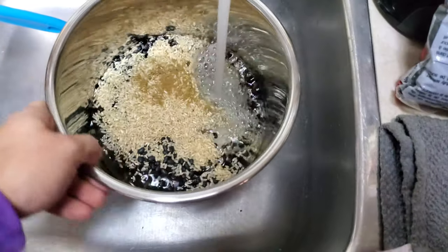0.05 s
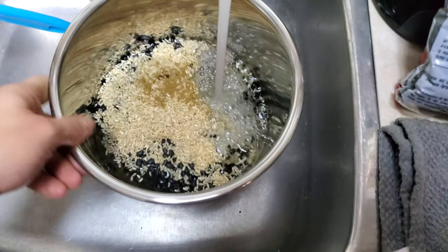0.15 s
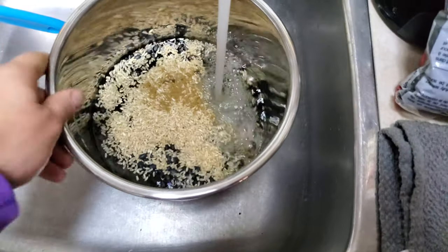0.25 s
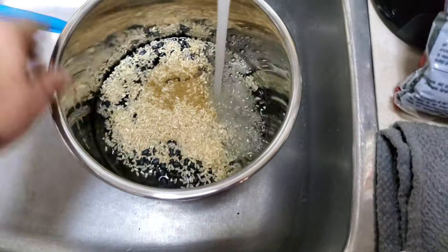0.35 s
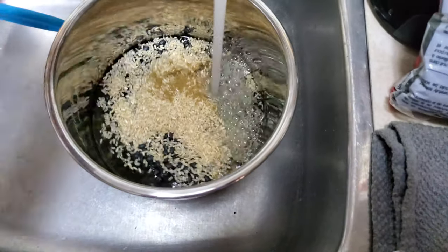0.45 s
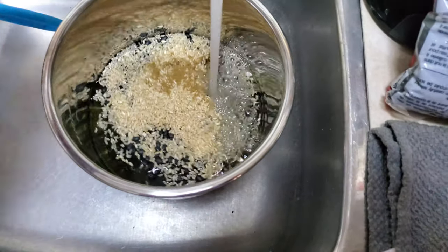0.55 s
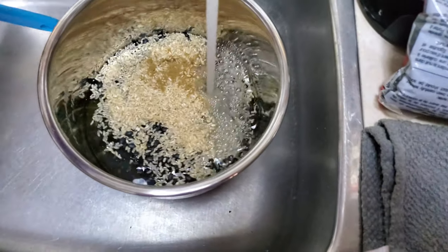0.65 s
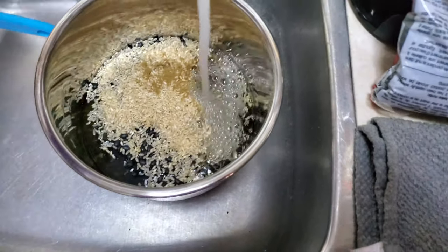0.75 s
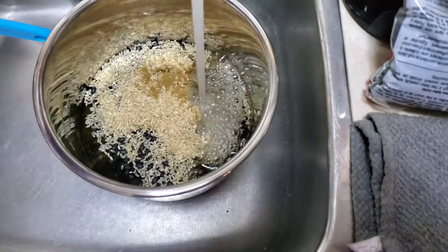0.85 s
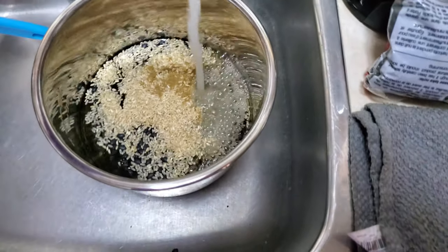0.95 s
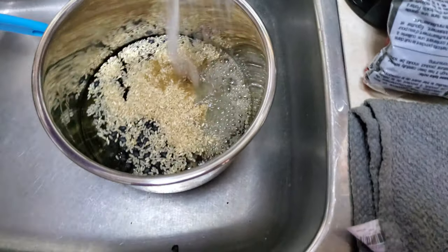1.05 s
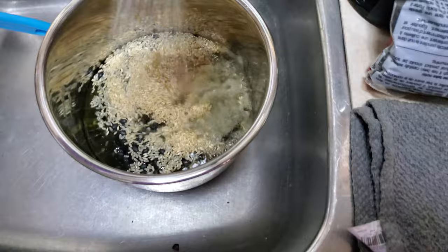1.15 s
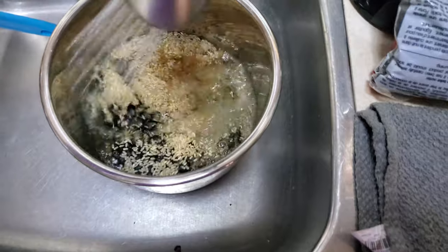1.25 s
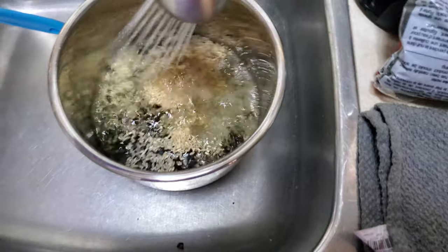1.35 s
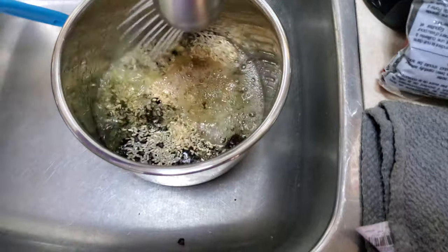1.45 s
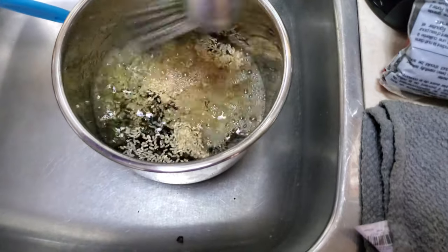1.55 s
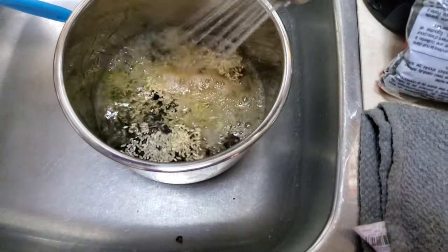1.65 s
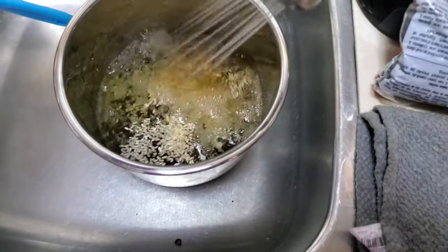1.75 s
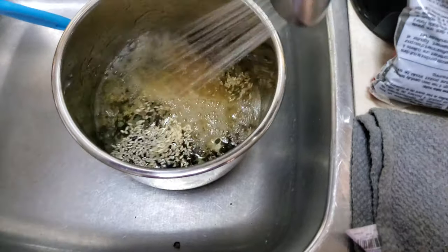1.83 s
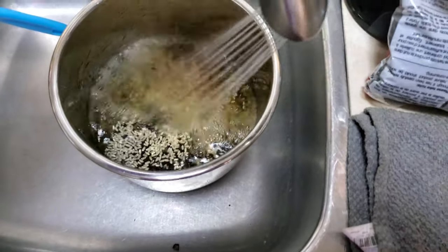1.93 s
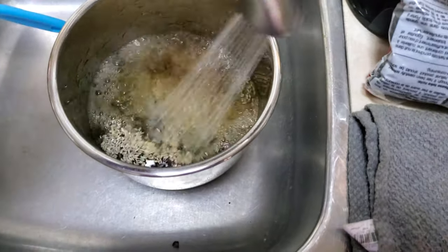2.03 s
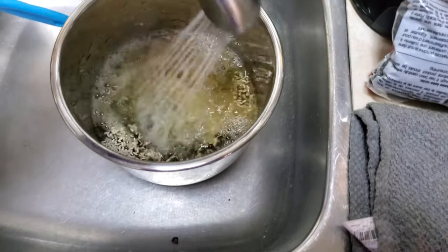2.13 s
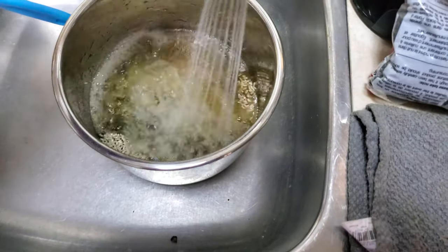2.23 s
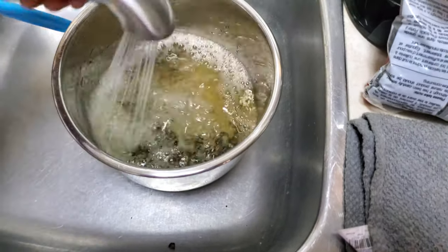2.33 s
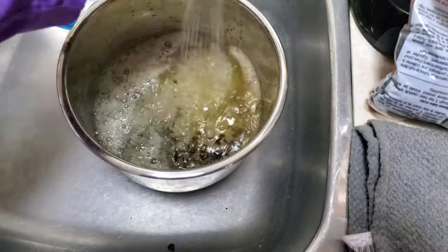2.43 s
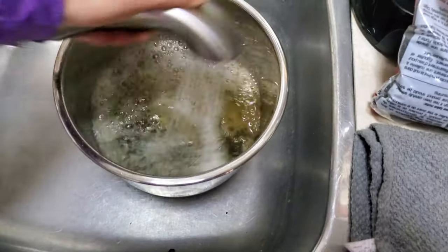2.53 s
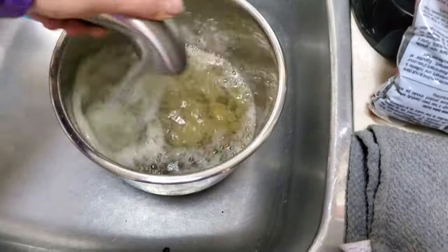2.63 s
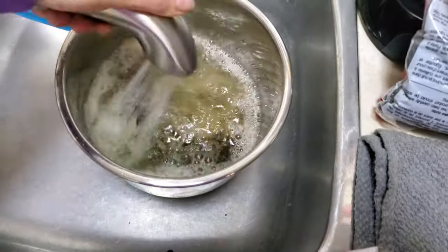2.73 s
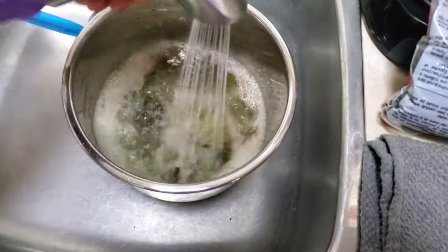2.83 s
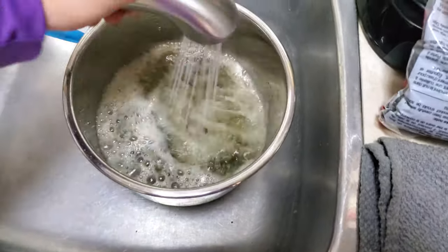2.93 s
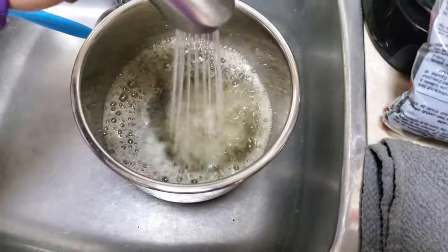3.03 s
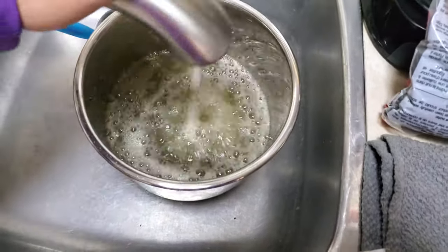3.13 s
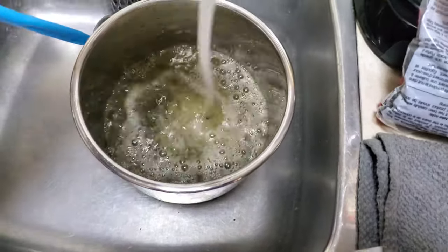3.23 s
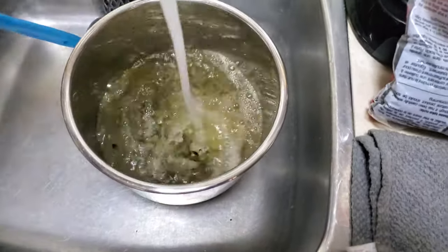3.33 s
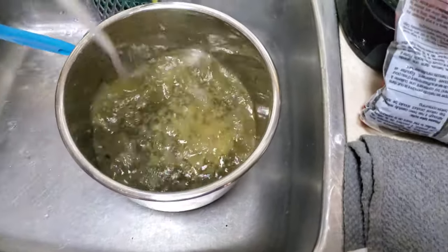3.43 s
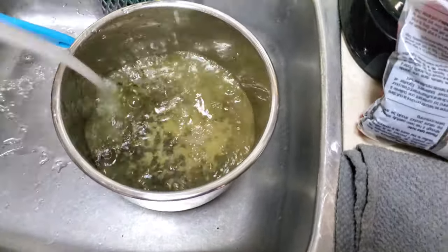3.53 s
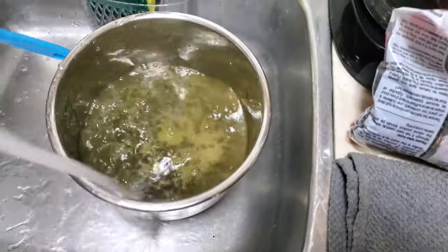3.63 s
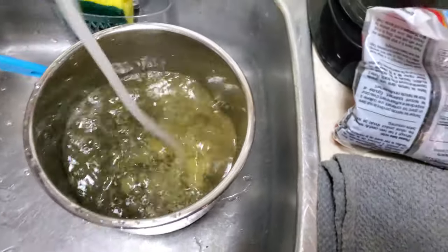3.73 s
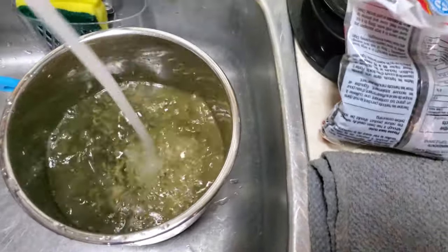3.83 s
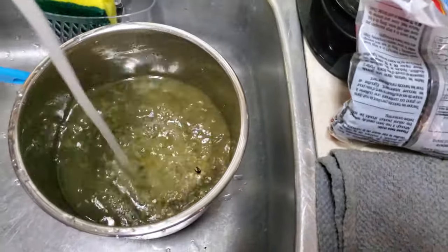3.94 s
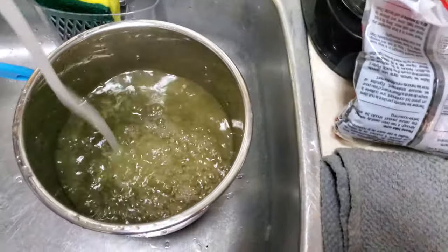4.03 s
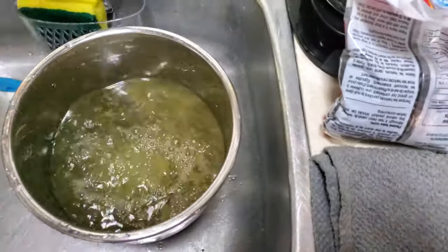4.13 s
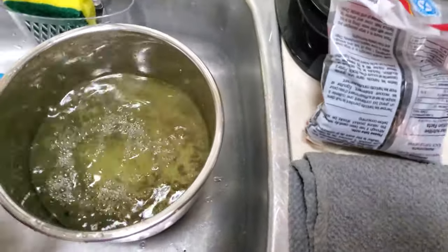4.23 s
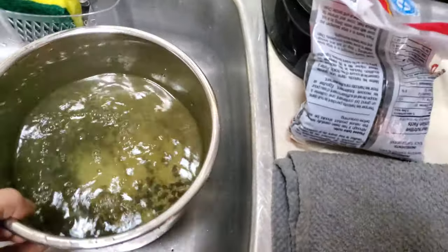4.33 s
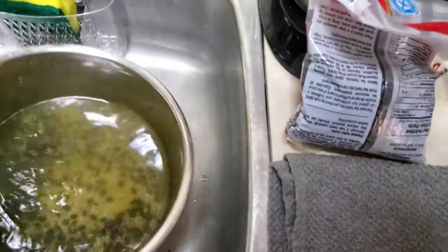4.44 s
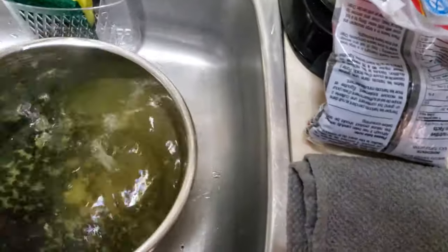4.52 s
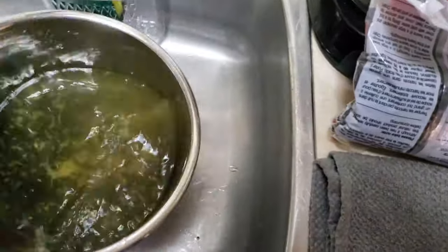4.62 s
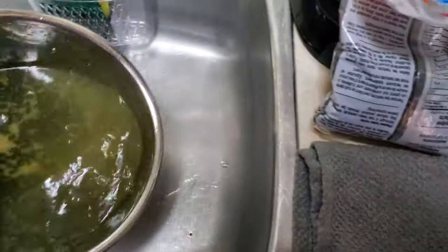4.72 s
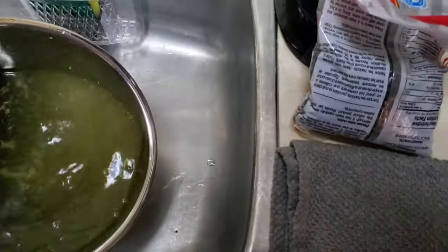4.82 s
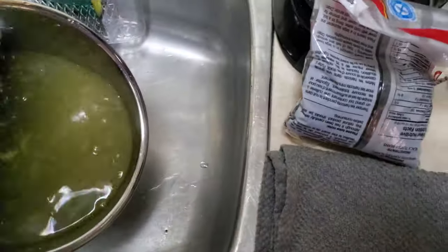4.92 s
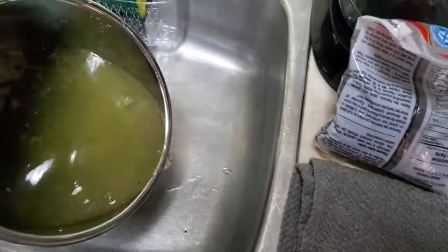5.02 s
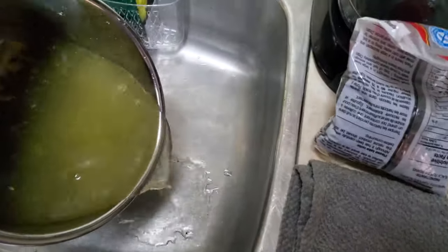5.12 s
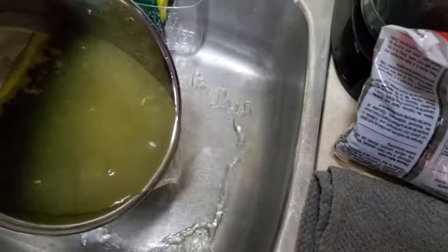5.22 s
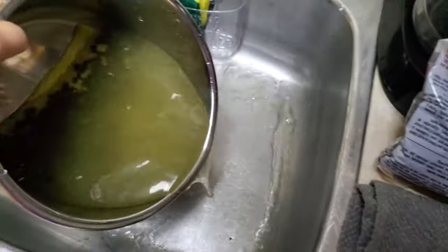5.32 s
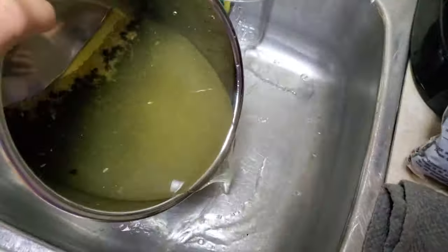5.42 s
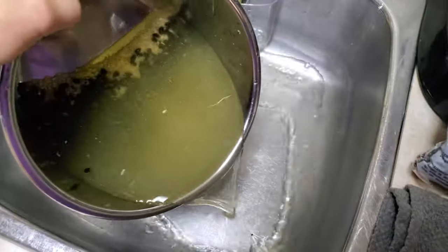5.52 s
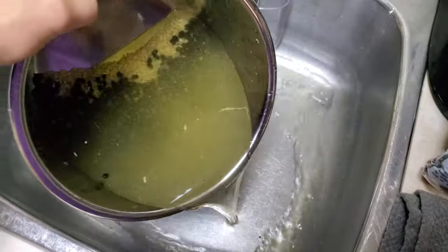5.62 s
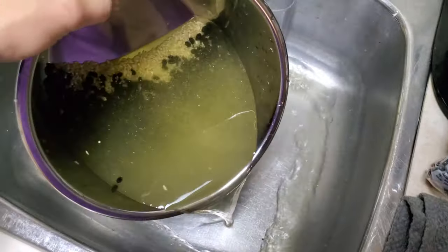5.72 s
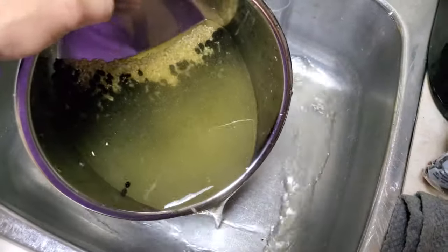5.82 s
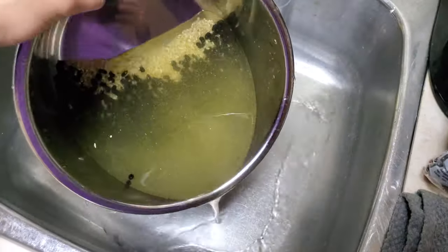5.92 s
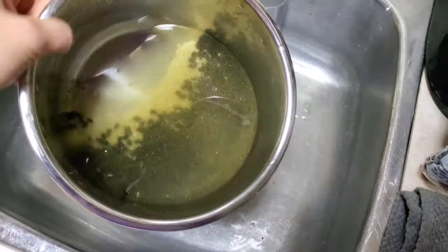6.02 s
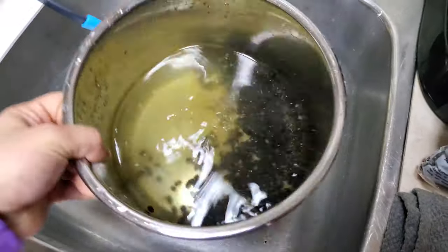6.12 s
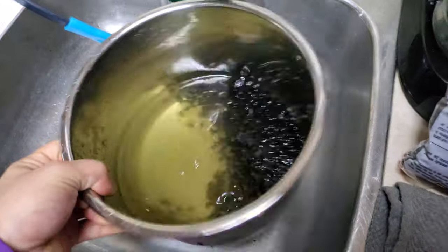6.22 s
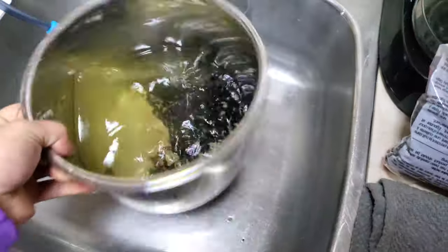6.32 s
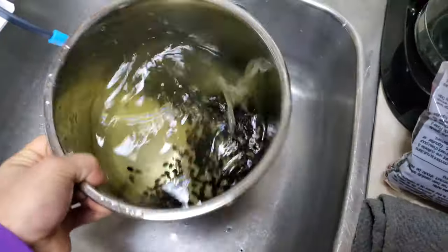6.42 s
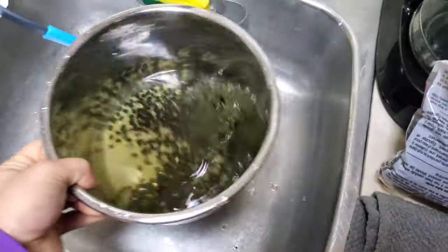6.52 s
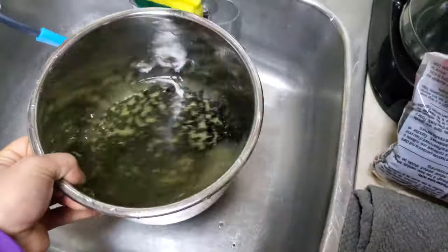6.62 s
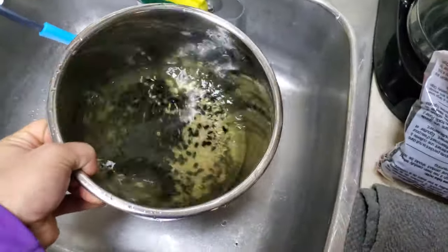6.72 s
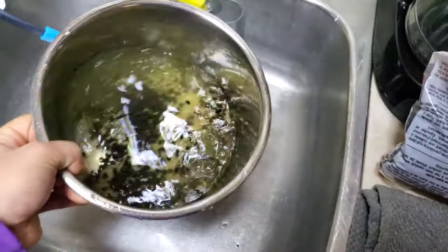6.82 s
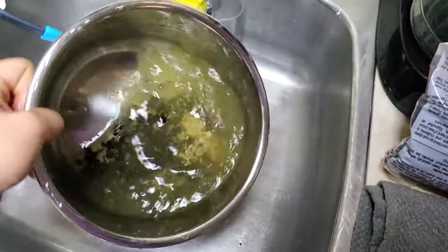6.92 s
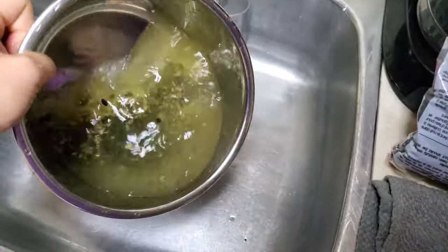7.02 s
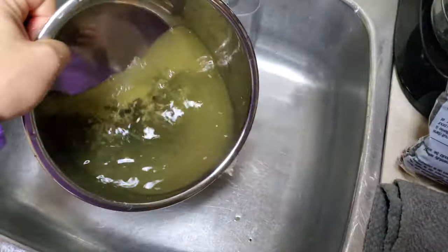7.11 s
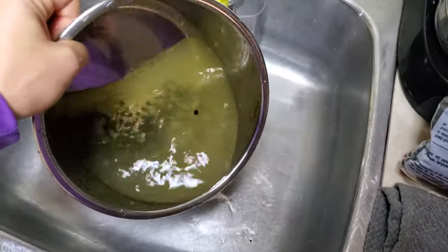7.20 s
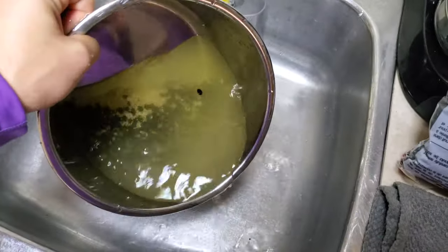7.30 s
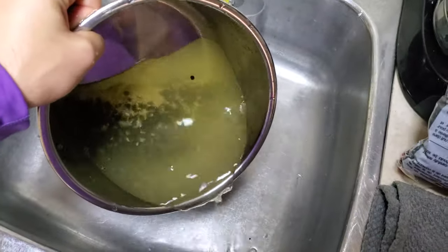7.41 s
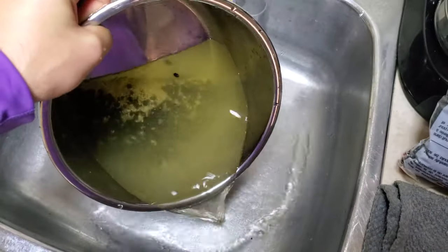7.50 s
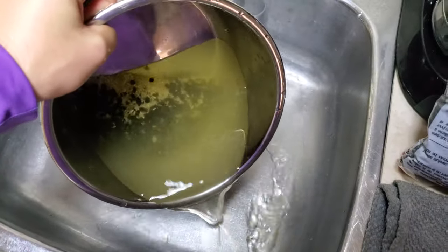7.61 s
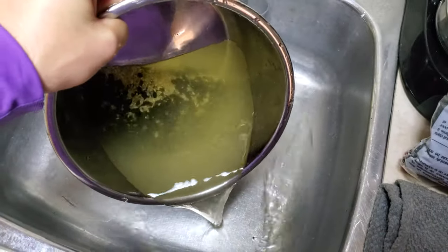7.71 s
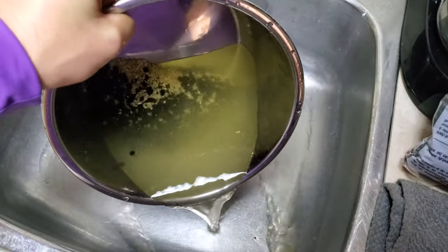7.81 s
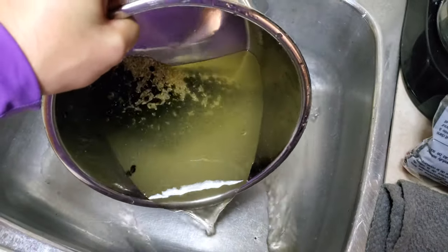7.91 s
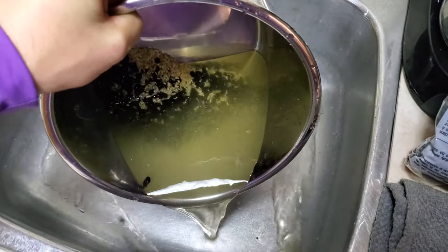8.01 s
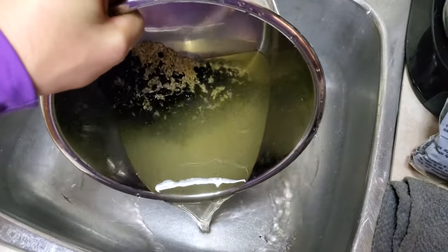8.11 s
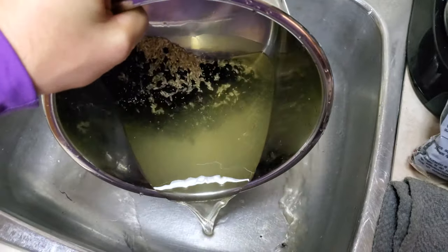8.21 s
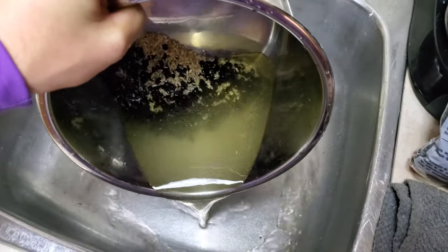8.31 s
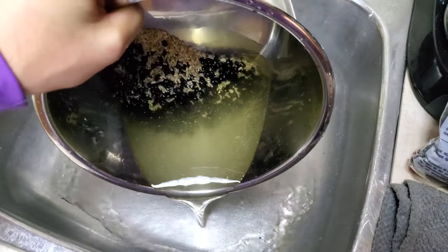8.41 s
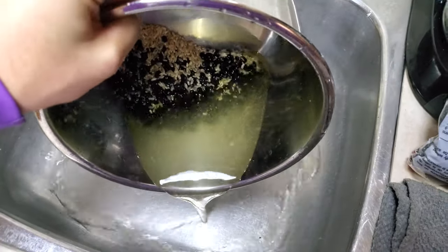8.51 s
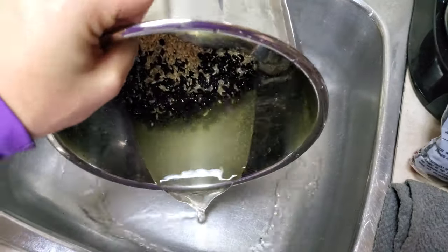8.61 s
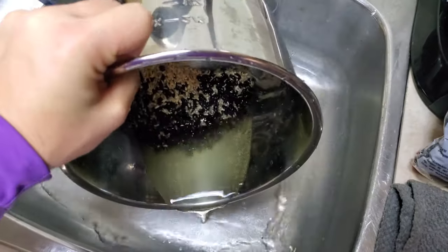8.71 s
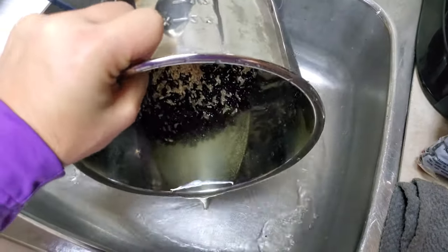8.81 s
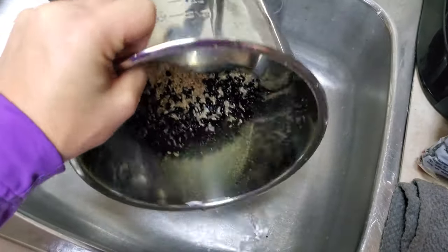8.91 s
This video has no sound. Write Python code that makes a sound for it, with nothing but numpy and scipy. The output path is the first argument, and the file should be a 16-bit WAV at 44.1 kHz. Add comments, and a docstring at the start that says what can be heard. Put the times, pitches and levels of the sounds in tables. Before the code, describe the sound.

Hissing, drumming water fills a metal pot with knocks and a click, then stops; foam fizzes, water sloshes and trickles into the sink.

```python
"""In a kitchen, a tap runs into a steel pot of grain in a steel sink: aerated jet, spray, jet again, then off.
The jet is hissing air, pattering drops, drumming steel and bubbles; foam fizzes after it as noisy drop hits.
The pot is poured off, swirled so that its base rubs on the sink, and poured again: showers of droplets and bubbles.
Plops are single sine bubbles, thumps and knocks damped tones, splashes and clacks short noise bursts.
A low drone of filtered noise and a wavering hum lies beneath."""
import sys
import numpy as np
from scipy import signal
from scipy.fft import rfft, irfft, next_fast_len
from scipy.io import wavfile
from scipy.ndimage import uniform_filter1d

SR = 44100
rng = np.random.default_rng(int(sys.argv[2]) if len(sys.argv) > 2 else 0)


def store_pcm(level_fs):
    """Save levels as 16-bit WAV."""
    pcm = np.round(np.clip(level_fs, -1, 1) * 32767).astype(np.int16)
    wavfile.write(sys.argv[1], SR, np.atleast_2d(pcm).T)


N = 394870
TIME = np.arange(N) / SR

# the tap runs as jet, spray, jet:
# opens_s, closes_s, opening_time_s, air_hiss_db, pot_drumming_db, churning_db
TAP_RUNS = [(0.0, 1.034, 0.00045, -24, -40.5, -38.5), (1.06, 3.16, 0.0038, -23.5, -32.5, -42.5),
            (3.184, 4.142, 0.021, -23, -43, -44.5)]
# tone of crackling droplets: pitch_hz, relative_level_db
FIZZ_TONE = [(1200, -28), (2500, -4.5), (4000, -1.5), (7000, 0), (9000, -13), (10500, -26), (15800, -37)]
# tone of the finest spray: pitch_hz, relative_level_db
MIST_TONE = [(4000, -55), (8000, -8.5), (10300, -3), (12000, 3), (15800, -2.5)]


def from_db(db):
    """Decibels to gain."""
    return 10 ** (np.asarray(db) / 20)


def rms_one(x):
    """Scale to unit power."""
    return x / np.sqrt(np.mean(x ** 2) + 1e-20)


def add(out, start_s, sound):
    """Mix a short sound into out."""
    start = int(np.clip(start_s * SR, 0, N - 1))
    out[..., start:start + sound.shape[-1]] += sound[..., :N - start]


def held(start, stop, attack_s, release_s):
    """Envelope that rises from start, holds, and decays after stop with the time constant release_s."""
    attack = np.clip((TIME - start) / attack_s, 0, 1)
    return attack * np.exp(-np.maximum(0, TIME - stop) / release_s)


def gains(rows, fade_s=0.0054):
    """One gain curve per dB column, dying quickly outside the rows' span."""
    s, *columns = np.transpose(rows)
    outside_s = np.maximum(0, np.maximum(s[0] - TIME, TIME - s[-1]))
    gate = np.exp(-outside_s / fade_s)
    return [gate * from_db(np.interp(TIME, s, c)) for c in columns]


def swells(rows):
    """Bell-shaped swells from rows (centre_s, length_s, level_db, ..): one gain curve per dB column."""
    power = 0
    for s, length, *db in rows:
        bell = np.exp(-np.minimum(4 * (TIME - s) / length, 8) ** 2)
        power = power + np.outer(from_db(db) ** 2, bell)
    return np.sqrt(power)


def drift(rate):
    """Slow random wander with spread 1, through 2 * rate points a second."""
    knots = rng.standard_normal(8192)
    return rms_one(np.interp(TIME * rate * 2, np.arange(len(knots)), knots))


def colour(x, spectrum):
    """Smooth equaliser through (Hz, dB) points."""
    size = next_fast_len(N + 4096)
    hz, db = np.transpose(spectrum)
    bins = np.arange(size // 2 + 1) * SR / size
    gain = from_db(np.interp(np.log(bins + 1), np.log(hz), db))
    return irfft(rfft(x, size) * gain, size)[..., :N]


def band(x, low_hz, high_hz):
    """Second-order band-pass."""
    edges = [low_hz, min(high_hz, SR / 2 - 1)]
    return signal.sosfilt(signal.butter(2, edges, "band", fs=SR, output="sos"), x + 1e-18)


def resonate(x, modes):
    """Parallel resonances (Hz, width Hz, dB) of alternating sign; unit power."""
    out = 0
    for k, (hz, width, db) in enumerate(modes):
        r = np.exp(-np.pi * width / SR)
        poles = [1, -2 * r * np.cos(2 * np.pi * hz / SR), r * r]
        ringing = signal.lfilter([1 - r * r, 0, r * r - 1], poles, x + 1e-18)
        out = out + (-1) ** k * from_db(db) * ringing
    return rms_one(out)


def waver(x, depth_s, rate):
    """Water sloshing against the walls bends the pot's pitch up and down: a wandering time shift."""
    then = TIME + depth_s * drift(rate)
    return np.array([np.interp(then, TIME, ear) for ear in x])


def impacts(per_s, spread_db, clump_db, clump_rate, direct=0.052):
    """Clumped drop hits, many small and few large: a central direct share, the rest reflected to each ear."""
    basin_t60_s = .03
    sizes = from_db(spread_db * np.minimum(rng.exponential(1, N), 4.5)) * rng.choice([-1, 1], N)
    landed = rng.random(N) < per_s / SR
    hits = rms_one(sizes * landed * from_db(clump_db * drift(clump_rate)))
    decay = from_db(-120 / (basin_t60_s * SR))   # acts on power, hence twice 60 dB
    lingering = signal.lfilter([1], [1, -decay], hits ** 2 + 1e-18)
    reflections = rms_one(np.sqrt(lingering) * rng.standard_normal((2, N)))
    return np.sqrt(direct) * hits + np.sqrt(1 - direct) * reflections


def bubble(hz, cycles, rise, place):
    """A sine that swells, dies 60 dB over its cycles and climbs near the surface; place (-1..1) shifts the ears."""
    age = np.arange(int(cycles * SR / hz)) * hz / SR   # in cycles
    between_ears = place * min(hz / 550, np.pi / 2) * np.array([[1], [-1]])
    swell = age / (.16 * cycles)
    tone = np.sin(2 * np.pi * age * (1 + rise * age / cycles / 2) + between_ears)
    return tone * (swell * np.exp(1 - swell)) ** 2


def bubbles(low_hz, high_hz, cycles, rise, spread_db, count, rough=0.38, flutter_at_1khz_hz=170):
    """Bubbles of random time, size and place, roughened by reflections off moving water; steady unit power."""
    out = np.zeros((2, N))
    for when, size, loud, life, place in rng.random((count, 5)):
        strength = from_db(-spread_db * np.log(loud + 0.012))
        hz = low_hz * (high_hz / low_hz) ** size
        add(out, when * N / SR, strength * bubble(hz, cycles * (.5 + life), rise, 2 * place - 1))
    top_hz = flutter_at_1khz_hz * np.sqrt(low_hz / 1000)
    flutter = rms_one(band(rng.standard_normal((2, N)), 20, top_hz))
    out = out * (1 + rough * flutter)
    power = np.mean(out ** 2, axis=0)
    return rms_one(out / np.sqrt(uniform_filter1d(power, SR // 3) + 0.029 * power.mean()))


def rings(rows, t60_at_1khz, size_law, rise, level_db, rough):
    """Single damped tones, longer when lower if size_law is above 0, with a rough halo of reflections."""
    out = np.zeros((2, N))
    for (s, hz, db), place in zip(rows, rng.uniform(-1, 1, len(rows))):
        t60 = t60_at_1khz * (1000 / hz) ** size_law
        tone = bubble(hz, t60 * hz, rise, place)
        noise = band(rng.standard_normal((2, SR // 2)), hz * 0.79, hz * 1.23)
        halo = rms_one(noise)[:, -tone.shape[1]:] * abs(signal.hilbert(tone))
        add(out, s - t60 / 20, from_db(db + level_db) * (tone + rough * halo))
    return out


def hollow(x, depth, sway=0.016, sway_hz=1.7):
    """Close echoes carve notches into the hiss, which shift as the pot and its water move."""
    # off the pot's base and walls: delay_s, strength
    pot_echoes = [(0.00083, 0.37), (0.00141, -0.34), (0.0023, .35), (0.0037, .3)]
    here = np.arange(N)
    out, power = x, 1
    for delay_s, strength in pot_echoes:
        then = here - delay_s * SR * (1 + sway * drift(sway_hz))
        out = out + strength * depth * np.array([np.interp(then, here, ear) for ear in x])
        power = power + (strength * depth) ** 2
    return out / np.sqrt(power)


def tap(hiss_db=1.0, fine_db=-9.5, glug_db=-4.0):
    """Air hisses in the jet; drops patter on the water, drum on the pot and drive bubbles under."""
    # air in the jet: pitch_hz, relative_level_db
    hiss_tone = [(1500, -62), (3500, -9.5), (4700, -4), (6500, -1.5), (8000, -4.5), (10300, -6.5),
                 (11800, -1), (15800, -3.5)]
    # drops on the water: pitch_hz, relative_level_db
    spatter_tone = [(600, -4), (1050, 0), (1330, -5), (2000, 2), (3300, 2.5), (5000, -0.5), (8000, -14),
                    (15000, -18)]
    # spatter as the water moves about the pot: time_s, level_db
    spattering = [(0, -27), (.2, -25), (.43, -36), (1.0, -34), (1.1, -29), (1.17, -26), (1.33, -29.5),
                  (1.42, -24), (1.7, -26), (2.07, -24), (2.62, -25), (3.12, -25), (3.22, -35),
                  (3.35, -27.5), (3.49, -30), (3.57, -27), (3.68, -29.5), (3.78, -29), (4.15, -33)]
    # the water finds a new spot and digs in: centre_s, length_s, drumming_db, churning_db
    plunges = [(0.17, 0.76, -31.5, -30.5), (1.19, 0.13, -29, -34.5), (1.378, .05, -45, -27.5),
               (1.9, 0.59, -26.5, -33), (2.06, 0.11, -33, -25), (2.235, 0.13, -27.5, -28),
               (2.41, .14, -29.5, -42), (3.06, 0.36, -24.5, -38), (3.418, 0.039, -25, -30),
               (3.555, 0.031, -31, -25), (3.755, 0.21, -26, -34.5), (3.83, 0.076, -47, -28)]
    # the pot under drops: pitch_hz, width_hz, relative_level_db
    pot_modes = [(496, 60, 1), (574, 85, 0.5), (693, 116, -6.5), (1075, 43, -6.5)]
    # the jet on still bare steel: pitch_hz, width_hz, relative_level_db
    bare_modes = [(1080, 53, 2), (1594, 130, 3.5), (2030, 140, -0.5), (2660, 160, 2.5), (4630, 460, 3),
                  (6950, 290, 3.5), (8470, 280, 1.5), (11800, 620, 4)]
    valve_close_s, pot_dies_s = 0.00097, 0.033   # time constants

    flowing, hiss, drum, churn = np.zeros((4, N))
    for opens, closes, opening_s, air_db, pot_db, deep_db in TAP_RUNS:
        valve = held(opens, closes, opening_s, valve_close_s)
        ringing = held(opens, closes, opening_s, pot_dies_s)
        flowing += valve
        hiss += valve * from_db(air_db)
        drum += ringing * from_db(pot_db)
        churn += ringing * from_db(deep_db)
    drum, churn = np.hypot([drum, churn], swells(plunges))
    # some flow still passes while the setting is switched
    leak = from_db(-17) * (TIME < TAP_RUNS[-1][1])
    hiss = np.maximum(hiss, leak * hiss.max()) * from_db(0.25 * drift(2.3))
    spatter = np.maximum(flowing, leak) * gains(spattering)[0]
    first_jet = held(*TAP_RUNS[0][:3], pot_dies_s)
    last_jet = held(*TAP_RUNS[-1][:3], pot_dies_s)
    # bare steel rings ever less as the grain covers it: 3 dB per second
    bare = first_jet * from_db(-27 - 3 * TIME)
    # the last jet drives coarse bubbles into the full pot
    full = last_jet * from_db(-49)

    air = hollow(impacts(16000, 0.75, 1.0, 60, direct=0.016), depth=0.081 + 0.32 * first_jet)
    air = rms_one(colour(air, hiss_tone))
    steel = resonate(rng.standard_normal((2, N)), bare_modes)
    drops = rms_one(colour(impacts(5000, 2.9, 1.0, 50, direct=0.086), spatter_tone))
    fine = bubbles(1501, 5690, cycles=91, rise=0.042, spread_db=5.5, count=4000)
    pot = waver(resonate(impacts(1500, 0.95, 1.6, 15, direct=0.41), pot_modes), depth_s=0.00256, rate=5)
    glugs = bubbles(399, 898, cycles=27, rise=0.071, spread_db=3.0, count=550, rough=0.35)
    deep = bubbles(215, 439.3, cycles=27, rise=0.097, spread_db=2.5, count=900)
    coarse = bubbles(806, 3300, cycles=29, rise=0.08, spread_db=7.0, count=900, rough=0.9)
    return (from_db(hiss_db) * hiss * air + bare * steel
            + spatter * (drops + from_db(fine_db) * fine)
            + drum * (pot + from_db(glug_db) * glugs)
            + churn * deep + full * coarse)


def rub(attack_s=0.029, release_s=0.022, shove_attack_s=0.0023, shove_release_s=0.032,
        chatter_hz=21, chatter_db=2.2):
    """Slips set pot and sink ringing; once full, the base sticks and slips in pulses at wavering pitches."""
    # the nearly empty pot is shoved under the tap: start_s, stop_s, level_db
    shoves = [(0.0, 0.11, -23.5), (0.117, 0.165, -21.5)]
    # the full pot's base rubs on the sink: start_s, stop_s, level_db
    rubs = [(6.354, 6.493, -34), (6.807, 7.022, -22)]
    # ring of the shoved pot: pitch_hz, width_hz, relative_level_db
    push_modes = [(491.3, 17, 0)]
    # ring of the full pot on the sink: pitch_hz, width_hz, relative_level_db
    rub_modes = [(249.3, 9.8, 11.5), (535, 32, -0.5), (825, 55, 4), (903, 68, 0.5), (1473, 52, -7)]
    slips = impacts(700, 1.5, 1.5, 20, direct=.6)
    pulses = np.sin(2 * np.pi * chatter_hz * TIME + .6 * drift(5))
    chatter = rms_one(from_db(chatter_db * pulses))
    empty = sum(from_db(db) * held(start, stop, shove_attack_s, shove_release_s) for start, stop, db in shoves)
    full = sum(from_db(db) * held(start, stop, attack_s, release_s) for start, stop, db in rubs)
    full_ring = waver(resonate(slips, rub_modes), depth_s=0.0006, rate=12)
    return empty * resonate(slips, push_modes) + full * chatter * full_ring


def rumble(level_db=-32.5, side_db=-3.5, hum_db=-42):
    """The kitchen's low background drone of noise, with a wavering hum from a narrow resonance."""
    # tone of the drone: pitch_hz, relative_level_db
    drone_tone = [(22, -13.5), (40, -10), (55, 2), (72, -1), (95, 2), (125, -2.5), (160, -7.5),
                  (260, -17.5), (400, -25.5), (800, -37), (1500, -93)]
    mid, side = rms_one(colour(rng.standard_normal((2, N)), drone_tone + [(4000, -68)]))
    hum = from_db(hum_db) * resonate(rng.standard_normal(N), [(94.7, 3, 0)])
    return from_db(level_db) * (mid + from_db(side_db) * side * np.array([[1], [-1]])) + hum


def knocks():
    """Each bump of the pot on the sink floor rings the modes at slightly different strengths and pitches."""
    # the nearly empty pot bumps: start_s, level_db
    bumps = [(0.003, -16.5), (0.211, -17.5), (0.239, -15), (0.326, -14)]
    # what pot and sink ring with: pitch_hz, t60_s, relative_level_db
    knock_modes = [(153, 0.096, -9.5), (298, 0.16, 0), (371, 0.15, -3), (654, 0.2, -11.5),
                   (1090, 0.15, -17), (1273, 0.18, -15.5)]
    age = np.arange(SR // 4) / SR
    out = np.zeros((2, N))
    for s, db in bumps:
        chances = rng.uniform(-1.14, 1, (len(knock_modes), 3))
        for (hz, t60, mode_db), (louder, higher, place) in zip(knock_modes, chances):
            phase = 2 * np.pi * hz * (1 + .02 * higher) * age + place * np.array([[.5], [-.5]])
            add(out, s, from_db(db + mode_db + 2 * louder - 60 * age / t60) * np.sin(phase))
    return out


def thumps():
    """Dull knocks of water and pot on the sink: low tones of steady pitch that die at once."""
    # time_s, pitch_hz, level_db before the common trim
    thump_rows = [(0.243, 95, -15.5), (0.352, 198, -16), (1.107, 99, -13), (1.365, 183, -14),
                  (2.042, 267, -14), (2.255, 190, -16.5), (3.807, 235, -12.5), (4.009, 399, -17.5),
                  (4.006, 70.4, -15), (4.151, 96, -9.5), (6.03, 300, -22), (6.386, 170, -15.5),
                  (6.46, 208, -10.5), (7.064, 266, -15.5)]
    return rings(thump_rows, t60_at_1khz=0.042, size_law=0, rise=0, level_db=-1.5, rough=0.3)


def clacks(decay_s=0.0045, low_hz=350, high_hz=3200):
    """A hard snap of noise that dies within milliseconds, as the spray head is switched and handled."""
    # start_s, level_db
    clack_rows = [(1.0194, -14.5), (3.162, -27), (4.008, -21.5)]
    snaps = sum(from_db(db) * held(s, s, 1 / SR, decay_s) for s, db in clack_rows)
    noise = rng.standard_normal((2, N)) + rng.standard_normal(N)   # partly shared by the ears
    return snaps * rms_one(band(noise, low_hz, high_hz))


def plops():
    """Single large bubbles: tones whose pitch climbs as they ring."""
    # time_s, starting_pitch_hz, level_db before the common trim
    plop_rows = [(1.146, 466, -19), (3.198, 515, -21.5), (3.202, 904, -25.5), (3.396, 573, -20.5),
                 (3.398, 1270, -24.5), (3.422, 384, -18), (3.539, 496, -23), (3.766, 513.2, -17),
                 (3.882, 547, -23), (3.961, 680, -21), (4.191, 548, -23.5), (4.435, 1525, -26),
                 (4.626, 1580, -23.5), (4.631, 2738, -23), (4.665, 3990, -24.5), (4.778, 2140, -36.5),
                 (4.895, 1620, -27), (5.07, 1950, -36), (5.163, 2350, -37), (5.392, 2590, -38),
                 (5.44, 1342, -33), (5.498, 775, -27), (5.605, 764, -24.5), (5.698, 2460, -32),
                 (5.894, 3230, -31), (5.982, 3420, -30), (6.019, 1750, -30), (6.058, 1665, -23),
                 (6.07, 2120, -27), (6.229, 3080, -26), (6.402, 1870, -24), (6.43, 2350, -25),
                 (6.539, 2610, -24), (6.596, 3900, -23), (6.7, 1060, -26), (6.728, 471, -18.5),
                 (6.828, 483, -20), (7.073, 540, -24), (7.083, 1066, -20), (7.721, 543, -20.5),
                 (7.83, 803, -20.5), (7.833, 1440, -41), (7.88, 635, -29), (7.915, 517, -27),
                 (7.955, 840, -32), (8.02, 560, -29.5), (7.963, 1420, -27), (8.076, 2390, -30),
                 (8.076, 3150, -29.5), (8.131, 1415, -30.5), (8.15, 1640, -28), (8.219, 3100, -30),
                 (8.266, 960, -29.5), (8.855, 3700, -33), (8.94, 1620, -27)]
    return rings(plop_rows, t60_at_1khz=0.052, size_law=0.08, rise=0.054, level_db=-2.0, rough=0.5)


def stray_drops():
    """A drop of spray on the microphone is one very short, dry spike."""
    # time_s, peak_db
    drop_rows = [(2.3694, 4.5), (2.4123, 1.5), (2.454, -1)]
    out = np.zeros((2, N))
    for s, db in drop_rows:
        add(out, s, from_db([db]))
    return out


def splashes(swell_s=0.0086, body_db=-5.5, spray_db=-4.0, treble_db=-1.0):
    """Each splash is a short shower of droplets: bright spray over a body below about 3 kHz."""
    # time_s, spray_level_db, body_level_db, both before the common trims
    splash_rows = [(3.568, -20, -22.5), (4.338, -28.5, -37), (4.431, -20.5, -31), (4.571, -21.5, -38),
                   (4.6047, -25, -31), (4.629, -26, -30), (4.676, -23, -55), (4.982, -37, -46),
                   (5.147, -32.5, -45), (5.314, -26, -39), (5.445, -27.5, -37), (5.497, -27.5, -58),
                   (5.615, -27, -29), (5.938, -21.5, -34), (6.312, -23.5, -56), (6.531, -21.5, -54),
                   (6.594, -18.5, -45), (6.6894, -19, -24), (6.772, -15.5, -17), (7.085, -20, -19.5),
                   (7.378, -25.5, -47), (7.654, -27, -48), (7.786, -29, -39), (8.195, -19, -21.5)]
    age = np.arange(SR // 8) / SR / swell_s
    shower = (age * np.exp(1 - age)) ** 2
    body, spray = np.zeros((2, N))
    for s, high_db, low_db in splash_rows:
        add(body, s - swell_s / 2, from_db(low_db + body_db) * shower)
        add(spray, s - swell_s / 2, from_db(high_db + spray_db) * shower)
    hits = impacts(4500, 1.2, .5, 83)
    bright = colour(hits, [(1500, -26), (4000, 6.5), (7000, 5.0), (10000, treble_db)])
    return body * rms_one(band(hits, 340, 3100)) + spray * rms_one(bright)


def foam(mist_db=-7, first_mist_db=-45, first_mist_s=0.16, rises_s=0.51, foam_db=-31.5, fades_db_per_s=22.5):
    """Foam left by the tap wells up and fizzes away as countless tiny bubbles burst."""
    age = TIME - TAP_RUNS[-1][1]
    level = np.clip(age / rises_s, 0, 1) * from_db(foam_db - fades_db_per_s * age)
    pops = impacts(7000, 3.5, 1.5, 25, direct=.08)
    # the smallest bubbles burst first
    finest = from_db(first_mist_db) * (age > 0) * np.exp(-abs(age) / first_mist_s)
    mist = np.hypot(level * from_db(mist_db), finest)
    return level * rms_one(colour(pops, FIZZ_TONE)) + mist * rms_one(colour(pops, MIST_TONE))


def stirring(uneven_db=1.5, uneven_hz=12):
    """Strength of spray, fizz, trickle and gurgle from pours, swirl and sloshes; the poured flow is uneven."""
    # flow over the rim, one list per pour: time_s, level_db
    pours = [
        [(5.2, -52.5), (5.45, -42), (5.55, -47), (5.63, -36.5), (5.8, -39), (5.87, -44), (5.96, -38.5),
         (6.1, -33), (6.22, -40)],
        [(7.56, -50.5), (7.64, -45), (7.9, -44.5), (7.98, -39), (8.2, -40), (8.35, -38.5), (8.55, -46),
         (8.7, -41.5), (8.94, -48.5)],
    ]
    # vigour of the swirl between the pours: time_s, level_db
    swirl = [(6.22, -34.5), (6.42, -27), (6.52, -31.5), (6.63, -29), (6.71, -20.5), (6.8, -23),
             (7.02, -26.5), (7.125, -40), (7.52, -47)]
    # a wave slaps the wall of pot or sink: centre_s, length_s, fizz_db, trickle_db, gurgle_db
    sloshes = [(4.16, 0.14, -32, -34, -30), (4.425, 0.089, -40, -23.5, -27), (4.61, 0.16, -43, -32, -54),
               (4.98, 0.25, -63, -40.5, -54), (5.72, 0.17, -44, -45, -47), (6.44, 0.21, -47, -34, -28.5),
               (7.075, 0.048, -38, -28, -24), (7.63, 0.062, -48, -39, -32), (7.96, 0.16, -55, -35, -27),
               (8.13, 0.25, -38.5, -39, -58)]
    # given off against the motion's own level: finest_spray_db, fizz_db, trickle_db, gurgle_db
    pour_mix = (-3.5, -2.5, 1.5, -3.5)
    # the same for the swirl: finest_spray_db, fizz_db, trickle_db, gurgle_db
    swirl_mix = (-10.5, -2, -11, -7.5)
    flow = sum(gains(rows)[0] for rows in pours) * from_db(uneven_db * drift(uneven_hz))
    fizz, trickle, gurgle = swells(sloshes)
    parts = [np.outer(from_db(pour_mix), flow),
             np.outer(from_db(swirl_mix), gains(swirl)[0]),
             [from_db(-1) * fizz, fizz, trickle, gurgle]]
    return np.linalg.norm(parts, axis=0), flow


def showers(per_s, spread_db, swell_s, wash):
    """Envelope of a stream that breaks into little showers of droplets over a steady wash; unit power."""
    step = 16   # samples per envelope point
    size = N // step + 1
    strengths = from_db(spread_db * np.minimum(rng.exponential(1, size), 2.5))
    starts = (rng.random(size) < per_s * step / SR) * strengths
    r = np.exp(-step / (swell_s * SR))
    bursts = rms_one(signal.lfilter([1], np.poly([r, r, r]), starts + 1e-12))
    return np.repeat(rms_one(np.hypot(wash, bursts)), step)[:N]


def droplets(per_s, spread_db, swell_s, wash, count=18):
    """Droplets of each size sound in their own narrow range and come in their own showers."""
    crackle = [impacts(4500, 1.8, 0.68, 18, direct=0.041) for _ in range(2)]
    edges = np.linspace(np.sqrt(800), np.sqrt(16500), count + 1) ** 2
    out = 0
    for k in range(count):
        out = out + band(crackle[k % 2], edges[k], edges[k + 1]) * showers(per_s, spread_db, swell_s, wash)
    return rms_one(out)


def pour(mist_db=-0.5, ping_db=-10.5, trickle_db=-8.0, patter_db=-4.5,
         slosh_db=-3.5, gurgle_db=-6.5, floor_drum_db=2.5):
    """Moving water breaks on the steel into droplets and ringing bubbles; the pours drum on the sink floor."""
    (mist, fizz, trickle, gurgle), flow = stirring()
    # the stronger the flow, the more the single grains merge into an even wash
    grainy = 1 / np.hypot(1, fizz / from_db(-31))
    merged = np.sqrt(1 - grainy ** 2)
    wash = impacts(9000, 2.2, 1.2, 25, direct=.08)
    grains = droplets(per_s=32, spread_db=3.0, swell_s=0.0027, wash=0.4)
    grains = grains * showers(per_s=28, spread_db=2.5, swell_s=0.0041, wash=0.97)
    spray = grainy * grains + merged * wash

    pings = bubbles(3020, 8370, cycles=150, rise=0.073, spread_db=-0.5, count=1500,
                    rough=0.7, flutter_at_1khz_hz=240)
    drips = bubbles(1300, 4300, cycles=88, rise=0.067, spread_db=6.0, count=1500,
                    rough=1.2, flutter_at_1khz_hz=174)
    patter = rms_one(colour(spray, [(600, 1), (1200, -5), (2000, 0), (3300, -2.0), (6000, -23)]))
    slosh = rms_one(band(impacts(400, 3.8, 2.4, 13, direct=0.14), 175, 321))
    gurgles = bubbles(400, 1400, cycles=32, rise=0.08, spread_db=3.5, count=1100, rough=0.7)
    drips = 0.9 * np.hypot(grainy, 0.4) * drips
    slosh_level = np.hypot(gurgle * from_db(slosh_db), flow * from_db(floor_drum_db))
    return (from_db(mist_db) * mist * rms_one(colour(spray, MIST_TONE))
            + fizz * (rms_one(colour(spray, FIZZ_TONE)) + from_db(ping_db) * pings)
            + trickle * from_db(trickle_db) * (drips + from_db(patter_db) * patter)
            + slosh_level * slosh + from_db(gurgle_db) * gurgle * gurgles)


def ticks(swell_s=0.0046, width_hz=850, level_db=-5.0):
    """Each drop on the steel gives a short, rough ring in a narrow range that the sink's reflections smear."""
    # start_s, pitch_hz, level_db before the common trim
    tick_rows = [(4.567, 6120, -28), (4.678, 6700, -23), (5.218, 4225, -32), (5.449, 6400, -28),
                 (5.907, 6100, -25), (6.314, 6700, -19.5), (7.378, 6040, -26), (8.455, 8100, -32)]
    age = np.arange(SR // 16) / SR / swell_s
    out = np.zeros((2, N))
    for s, hz, db in tick_rows:
        noise = band(rng.standard_normal((2, SR // 8)), hz - width_hz / 2, hz + width_hz / 2)
        ring = rms_one(noise)[:, -len(age):]
        add(out, s, from_db(db + level_db) * age * np.exp(1 - age) * ring)
    return out


def kitchen(x, t60=0.15, tail_db=-14):
    """The room's faint tail of decaying noise, different at each ear."""
    age = np.arange(SR // 3) / SR
    echoes = rms_one(rng.standard_normal((2, len(age))) * from_db(-60 * age / t60)) / np.sqrt(len(age))
    return x + from_db(tail_db) * signal.fftconvolve(x, echoes, axes=1)[:, :N]


def limiter(x, limit_db=-3.5, release_db_per_s=417):
    """The gain drops at once on a peak and recovers at a steady rate."""
    over = np.maximum(0, 20 * np.log10(abs(x).max(axis=0) + 1e-9) - limit_db)
    recovery = release_db_per_s * TIME
    return x * from_db(recovery - np.maximum.accumulate(over + recovery))


def scene():
    """Water and pot sound in the kitchen; stray drops and the drone stay without the room's tail."""
    water = tap() + plops() + splashes() + foam() + pour() + ticks()
    steel = rub() + knocks() + thumps() + clacks()
    return kitchen(water + steel) + stray_drops() + rumble()


def record(dry):
    """Each microphone port has its own colour; a limiter ducks after peaks; the top is cut."""
    # difference between the ports: pitch_hz, left_minus_right_db
    balance = [(100, 0.5), (560, 4.5), (900, 2), (1350, 5.5), (2200, 3), (3200, 0), (5000, -2), (7600, -2),
               (9000, -9.5), (10500, 0.5), (11700, 0.5), (13000, -4), (15000, 10)]
    ports = np.array([colour(x, [(hz, sign * db / 2) for hz, db in balance]) for x, sign in zip(dry, (1, -1))])
    low_pass = signal.ellip(12, .1, 80, 15750, fs=SR, output="sos")   # cutoff in Hz
    return signal.sosfilt(low_pass, limiter(ports))


dry = scene()
out = record(dry)
store_pcm(out)
```